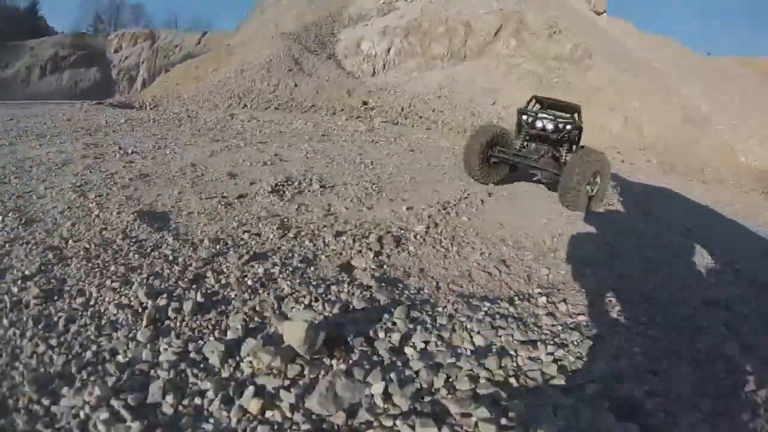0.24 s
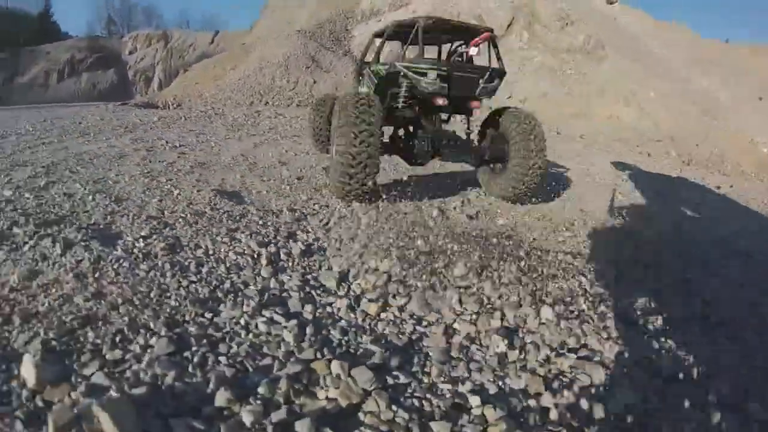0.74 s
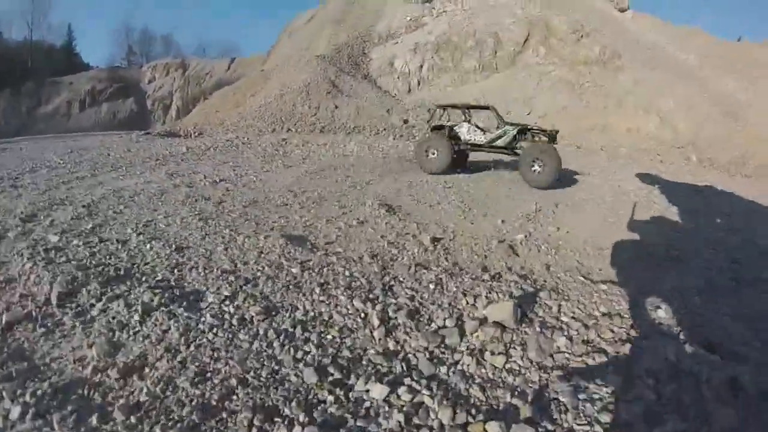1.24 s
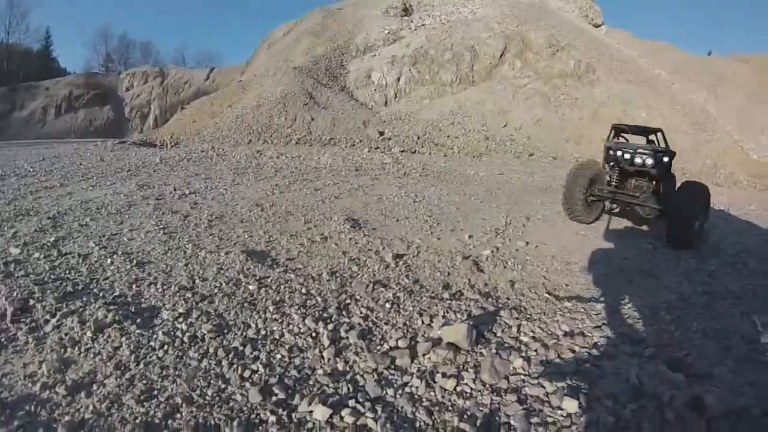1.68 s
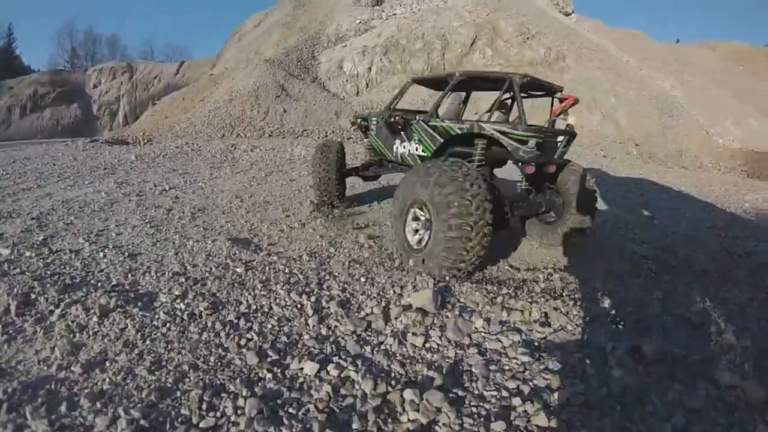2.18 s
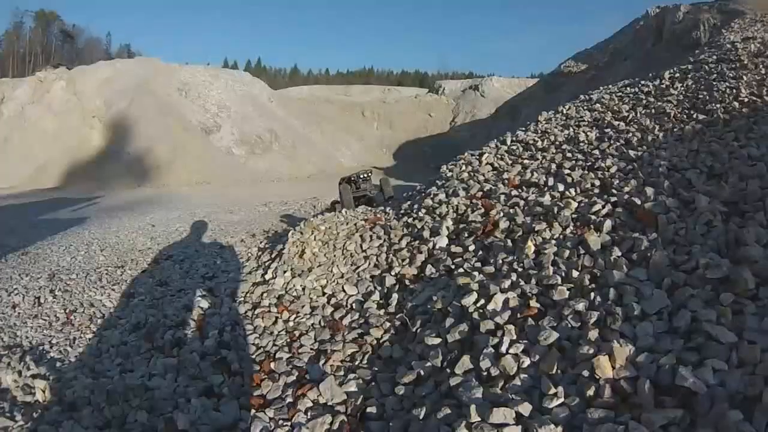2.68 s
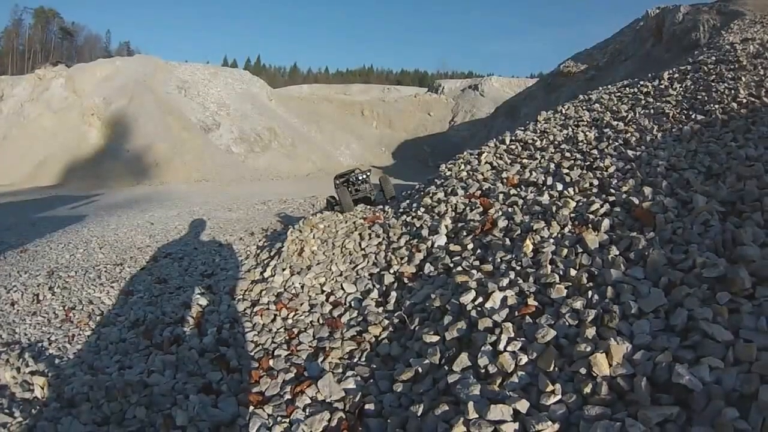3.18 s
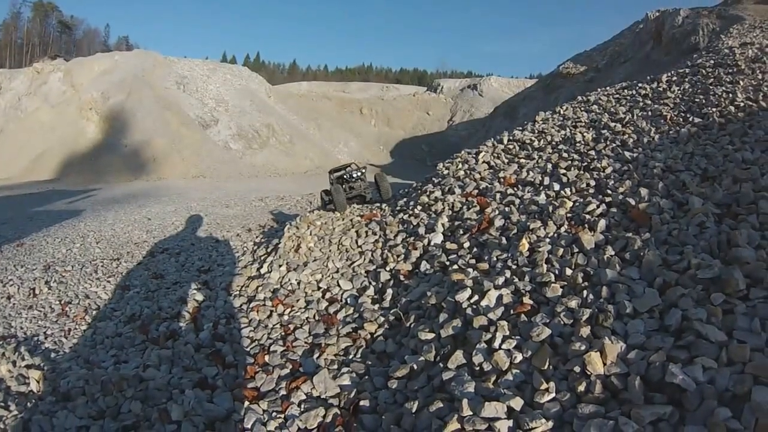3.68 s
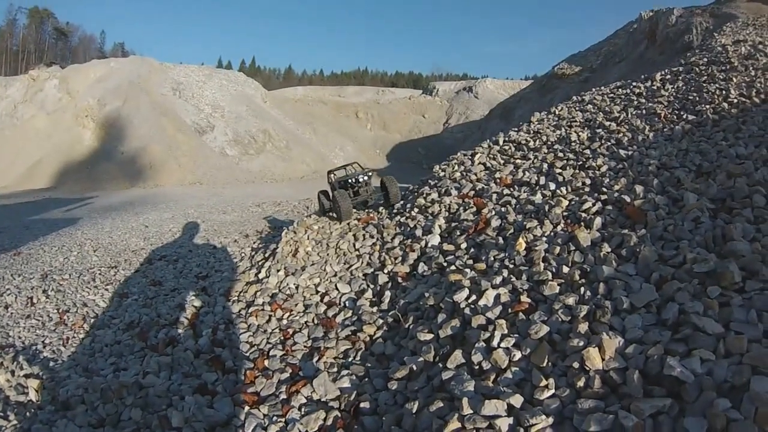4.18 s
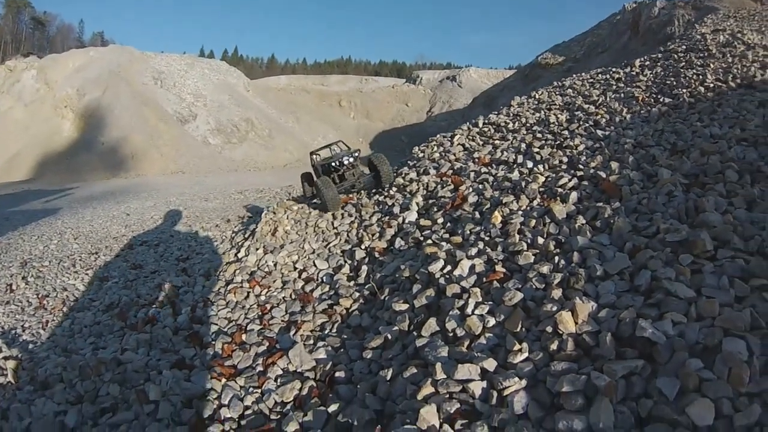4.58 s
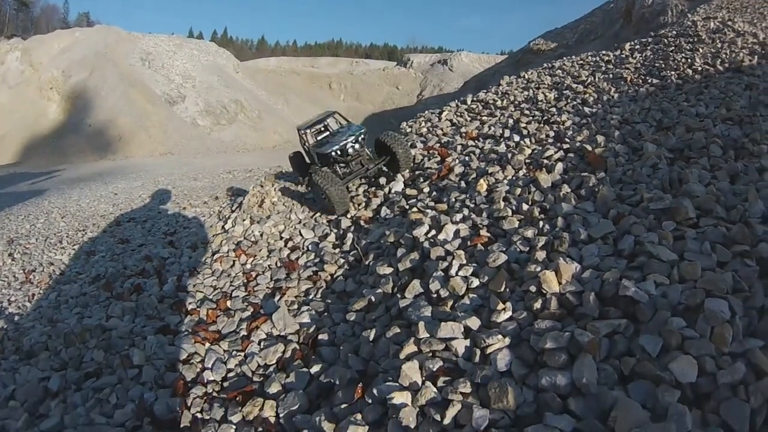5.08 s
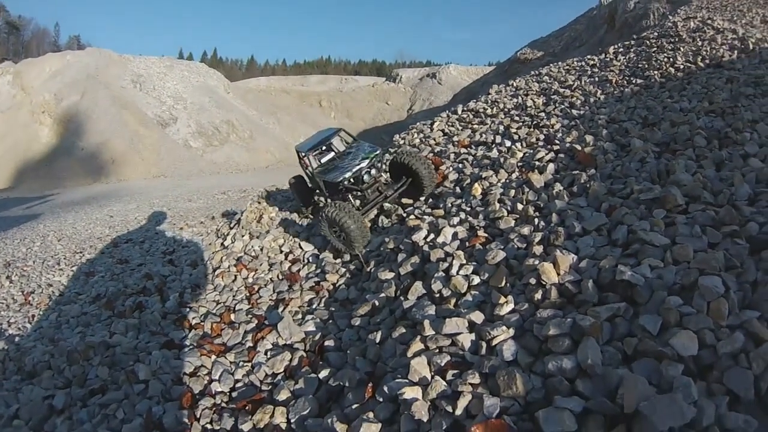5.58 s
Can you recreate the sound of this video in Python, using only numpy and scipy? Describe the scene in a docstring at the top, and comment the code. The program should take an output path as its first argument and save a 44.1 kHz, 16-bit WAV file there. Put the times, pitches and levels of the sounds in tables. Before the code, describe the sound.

Open quarry, faint even air, both channels alike. From 0 to 2.5 s a small electric truck spins circles on gravel close by: tyres drum, grind and spray grit, swelling to a first pass near 0.6 s, receding around 1.5 s, and swelling again near 2.2 s, with bouncing surges. A shrill, rough gear tone around 4 kHz sags and chirps with rapid bites. Small ticks hit the camera housing; very loud, hard stone cracks come at 0.86 and 1.1 s, with a lesser cluster at 0.93 s and dull jolts beneath. At 2.5 s it abruptly becomes much quieter: the truck crawls up a stone heap from three metres to one. Low, pulsing gear whine is faint at first, stronger from 3.8 to 5.2 s, then sinks. Tyres grate, grit hisses, brief squeaks sound and a thin high controller whistle persists. Dull stone clacks are sparse, then cluster from 5.15 s to the end.

```python
"""Close by in an open quarry, a small electric truck spins circles on gravel, tyres drumming and grinding.
Its gears sing and sag each time the tyres bite; flung stones ring the camera's housing near the microphone.
Then, abruptly, it crawls up a heap of stones from about three metres to one, gears whining low,
speed controller whistling. Shaped noise makes tyres, grit and air; swept tones the gears; decaying modes the hits."""
import sys
import numpy as np
from scipy import signal
from scipy.fft import rfft, irfft, next_fast_len
from scipy.io import wavfile
from scipy.ndimage import uniform_filter1d

SR = 44100
rng = np.random.default_rng(int(sys.argv[2]) if len(sys.argv) > 2 else 0)


def log_audio(samples):
    """Write samples as a 16-bit WAV file to the path given in sys.argv[1]."""
    # one column per channel
    frames = np.atleast_2d(samples).T
    # limit to full scale, then quantise
    limited = np.clip(frames, -1, 1)
    pcm = np.round(limited * 32767).astype(np.int16)
    wavfile.write(sys.argv[1], SR, pcm)


N = 257544
TIME = np.arange(N) / SR
CUT_S = 2.516  # the close spin ends and the climb begins
EDGE_HZ = 15500  # upper limit of the band
FREE_HZ, IDLE_HZ = 4407, 419  # gear pitch with the wheels spinning freely, and at a creep
SAG_S, RECOVER_S = 0.03, 0.028  # longest slowing under a bite, and the time to pick up again

# The truck circles past twice. Each row: time in seconds, distance in metres.
CIRCLING = [(0, 2.1), (.45, 1.5), (.6, 0.96), (1.0, 1.15), (1.25, 1.7), (1.5, 2.48), (1.75, 2.06),
            (2.2, 0.84), (2.5, 1.14)]
# The bouncing chassis presses the tyres in (+) or lifts them (-).
# Each row: start in seconds, length in seconds, change of load in dB (in full on the roar).
BOUNCES = [(0.51, .17, 4), (0.713, 0.048, 3), (0.768, 0.052, -6), (0.82, 0.084, 6.5), (1, 0.038, 2.5),
           (1.482, 0.047, -3.5), (1.566, 0.063, 3), (1.65, 0.095, -4), (1.739, 0.064, 5),
           (1.899, 0.073, 5.5), (1.987, .04, 0), (2.035, 0.1, 6.5), (2.158, 0.052, 3.5),
           (2.384, 0.039, 2.5)]
# Spectra of the spinning tyres' drumming, grinding and flung grit.
# Each row: frequency in Hz, relative level in dB.
SPIN_ROAR = [(25, -26.5), (80, -12.5), (110, -8.5), (141, -2), (172, -6.5), (280, 0), (450, 1.5),
             (640, 0.5), (800, -4), (1030, -0.5), (1200, -8), (1450, -16.5), (2200, -47)]
SPIN_CRUNCH = [(900, -23), (1450, -4), (1750, 6.5), (2100, -2), (2500, 0.5), (3300, -2), (3950, 2.5),
               (4400, -8), (4800, -13), (5400, -5.5), (6200, -24), (9000, -35)]
SPRAY = [(3500, -25.5), (5400, -1), (6600, -2), (8200, 2), (9400, -0.5), (11000, -0.5), (12500, -2.5),
         (13600, -8), (14700, -9), (15600, -20.5)]
# Spectrum of the open pit's hush. Each row: frequency in Hz, relative level in dB.
AIR = [(25, -1.5), (70, 0.5), (200, -3.5), (450, -6), (800, -11), (1900, -21.5), (4000, -20.5),
       (4800, -23.5), (5600, -21.5), (8000, -25), (12500, -25.5), (13500, -45.5)]
# Tyres bite and drag the motor down.
# Each row: start in seconds, length in seconds, sag in Hz, level in dB ahead of the gear case.
BITES = [(.010, 0.032, 543, -50.5), (0.141, 0.039, 690, -49.5), (0.227, 0.02, 444, -47.5),
         (0.284, .036, 706, -45.5), (0.376, 0.028, 419, -40), (0.397, .036, 379, -42.5),
         (.451, .029, 558, -41), (.524, 0.015, 603, -38), (0.589, .022, 551, -36),
         (0.653, 0.037, 1353, -36.5), (.698, 0.047, 500, -47), (0.873, 0.037, 1353, -39),
         (1.015, 0.015, 1100, -38.5), (1.192, 0.022, 473, -48), (1.232, .032, 684, -47.5),
         (1.306, 0.025, 779, -49), (1.389, .03, 400.4, -57), (1.424, .065, 505, -47),
         (1.599, 0.015, 1720, -43.5), (1.67, 0.027, 546, -47), (1.762, .045, 477.2, -48),
         (1.805, 0.033, 948, -40.5), (1.888, .065, 520, -44), (1.957, .029, 899, -35.5),
         (2.034, .038, 393, -43), (2.091, .038, 954, -37.5), (2.175, .032, 798, -38),
         (2.246, .047, 703, -38.5), (2.321, .035, 600.4, -41.5), (2.412, .024, 652, -54),
         (2.466, 0.034, 780, -41)]
# Partials of the racing gears. Each row: multiple of the gear pitch, relative level in dB, roughness 0-1.
FAST_ORDERS = [(.25, -7.5, 0.6), (1, -0.5, 0.4), (2, -29.5, 0.9)]
# Response of the case to the racing gear pitch. Each row: frequency in Hz, gain in dB.
GEAR_CASE = [(2700, -5.5), (3300, -7.5), (3900, 0), (4250, -1), (4600, -8)]
# Spectrum of the rasping teeth. Each row: frequency in Hz, relative level in dB.
GEAR_RASP = [(2400, -23), (3400, -10.5), (3900, 6), (4300, -3.5), (4700, -24), (5400, -12), (6200, -28),
             (7800, -25.5), (9100, -22.5), (10500, -32)]
# Flung stones hit the housing. Each row: start in seconds, relative level in dB,
# weight of the low modes in dB, weight of the highest modes in dB.
STRIKES = [(.3895, -35, -14, -2), (.7180, -37.5, -7, 12), (.7605, -40, -22, 11), (.7690, -41.5, -13, 10),
           (.7920, -34, -18.5, 8), (0.8595, -3.5, -20.5, 1), (0.8613, -12, -16, -7), (.8655, -33, -3, 13),
           (.8715, -27.5, -24.5, 10), (.8942, -27, -2, 9), (.8990, -35.5, -16, -3), (.9020, -35, -13.5, 1),
           (0.9307, -16.5, -4.5, -1.5), (0.932, -14, -17, -4), (.9335, -25.5, -8.5, 9),
           (.9860, -40.5, -14.5, 3), (1.0645, -39, -8, 2), (1.0961, -2, 0.5, -6.5), (2.078, -37.5, -15, -4),
           (2.2000, -29, -28, 17), (2.3, -42, -15, 9), (2.3300, -25, -16, 17), (2.4422, -37.5, -24, 7)]
# The housing's modes. Each row: frequency in Hz, relative level in dB, 60 dB decay time in seconds.
HOUSING = [(746, -19, .075), (840, -1.5, 0.023), (976, -6, 0.016), (1600, -6, 0.016), (1910, -10.5, 0.014),
           (2430, -6.5, 0.012), (2994, -5, 0.018), (3480, -8.5, .009), (3930, -4.5, .011),
           (4500, -2.5, 0.0061), (5068, 0.5, 0.0067), (5970, -11, .008), (6590, -9, .008),
           (7220, -15.5, 0.01), (10570, -9, 0.0038), (11600, -9.5, 0.0035), (14200, -20.5, 0.0049)]
# The camera is jolted. Each row: start in seconds, relative level in dB.
JOLTS = [(0.559, -61), (0.74, -55.5), (0.86, -62.5), (1.094, -61)]
# The truck climbs towards the microphone. Each row: time in seconds, distance in metres.
CLIMBING = [(2.54, 3.26), (3.6, 2.9), (4.3, 2.42), (4.9, 1.34), (5.84, 1.13)]
# Blips of throttle, each a rounded swell. Each row: time of the top in seconds, half width in seconds,
# top gear pitch in Hz, relative level in dB.
BLIPS = [(2.62, .05, 474, -75), (2.989, .06, 485, -74), (3.235, .07, 602, -72.5), (3.70, .04, 451, -76),
         (3.817, .06, 899.4, -61), (3.961, .04, 734, -67.5), (4.22, 0.066, 630, -65),
         (4.305, .075, 812, -61), (4.435, .1, 745, -63), (4.49, .08, 815, -66), (4.595, 0.075, 930.4, -64),
         (4.72, .075, 957.6, -66), (4.824, .075, 950, -64.5), (4.869, .38, 846.4, -67.5),
         (4.972, .055, 1178, -63), (5.06, .085, 995, -69.5), (5.125, 0.098, 863.5, -67.5),
         (5.261, .08, 574, -74), (5.431, .1, 472, -76)]
# Spectra of the climb: rolling tyres, grating stones, fine grit. Each row: frequency in Hz, relative level in dB.
CRAWL_ROAR = [(25, -8), (60, -8), (160, -5), (260, -7.5), (450, -0.5), (650, -6), (1000, -7), (1400, -13),
              (1850, -9), (2400, -18.5), (5000, -41.5)]
STONES = [(300, -36), (900, -8), (1400, -7), (1850, -1), (2300, -3), (3100, -1), (4000, 8.5), (4800, -5),
          (5300, 5.5), (6300, -3), (7500, -8), (11000, -19), (12600, -15), (13400, -67)]
FINE_HISS = [(4500, -29), (6200, -6), (8400, 1), (9300, -3.5), (10400, -2), (12500, -3), (13300, -19)]
# Fine grit slides from under the tyres. Each row: start in seconds, length in seconds, relative level in dB.
SLIDES = [(3.8, 0.088, -80.5), (4.23, .09, -69), (4.566, 0.44, -79), (5.519, 0.35, -83)]
# Partials of the crawling gears. Each row: multiple of the gear pitch, relative level in dB.
SLOW_ORDERS = [(1, 1), (2, -5.5), (3, -17), (4, -20), (5, -22), (6, -23)]
# Resonances of the gearbox. Each row: frequency in Hz, gain in dB.
GEARBOX = [(400, -3), (650, -10), (850, 1), (1250, -0.5), (1600, -2), (1900, -0.5), (2400, -7), (3000, 11),
           (3900, 10.5), (5000, 4)]
# Swell of the controller's whistle. Each row: time in seconds, gain in dB.
WHISTLE = [(2.54, .5), (3.8, -2), (4.3, 0.5), (5.3, 8), (5.6, 2), (5.84, 10)]
# Brief squeaks from the chassis. Each row: time of the middle in seconds, relative level in dB.
SQUEAKS = [(2.605, -73.5), (2.968, -69.5), (3.152, -71.5), (3.316, -76.5), (5.153, -64), (5.428, -73)]
# Stones shift under the crawling tyres. Each row: time in seconds, relative level in dB,
# pitch of the knock in Hz, share of scrape in dB.
CLACKS = [(2.607, -49, 430, -13), (2.691, -46, 463, -28), (2.713, -52, 333, -9.5), (2.969, -56, 337, -8),
          (2.992, -51.5, 536, -16.5), (3.153, -51, 507, -14.5), (3.181, -56, 402, -9),
          (3.298, -52.5, 447, -17.5), (3.334, -51, 477, -22), (3.392, -48, 503, -22.5),
          (3.785, -55, 820, -13.5), (3.951, -56, 707, -11.5), (3.998, -51, 431, -13),
          (4.818, -56.5, 970, -3), (5.15, -45, 799, -20), (5.171, -40, 735, -13),
          (5.224, -40, 420.5, -14.5), (5.232, -46, 740, -7), (5.249, -47, 342, -11),
          (5.281, -56.5, 756, 3.5), (5.326, -65, 810, -14), (5.384, -52, 486, -28), (5.425, -46, 658, -28),
          (5.472, -52, 711, -9.5), (5.56, -46.5, 471, -15), (5.683, -44, 480, -22),
          (5.728, -48.5, 443, -8.5), (5.762, -58.5, 450, -0.5)]


def gain_of(db):
    """Decibels to amplitude."""
    return 10 ** (np.asarray(db) / 20)


def evened(x):
    """Scales to unit rms."""
    return x / np.sqrt(np.mean(x ** 2) + 1e-20)


def read(points, hz):
    """Reads a spectrum on a log-frequency axis."""
    f, value = np.transpose(points)
    return np.interp(np.log(hz + 1), np.log(f + 1), value)


def curves(rows):
    """One value a sample for each column of a timed table."""
    s, *columns = np.transpose(rows)
    return [np.interp(TIME, s, c) for c in columns]


def add(mix, s, sound):
    """Mixes a sound in at time s."""
    part = mix[max(round(s * SR), 0):][:len(sound)]
    part += sound[:len(part)]


def colour(x, spectrum, size=4096):
    """A causal, minimum-phase filter with the given spectrum, so that clicks keep their sharp fronts."""
    log_gain = np.log(gain_of(read(spectrum, abs(np.fft.fftfreq(size, 1 / SR)))))
    response = np.exp(np.conj(signal.hilbert(log_gain)))
    taps = np.fft.ifft(response).real[:size // 2]
    return signal.oaconvolve(x, taps)[:len(x)]


def noise_like(spectrum):
    """Steady noise of the given spectrum."""
    return colour(rng.standard_normal(N), spectrum)


def drift(rate_hz):
    """Random wander of unit rms, fading out smoothly above about the given rate."""
    size = next_fast_len(N, real=True)
    slowness = np.exp(-(np.fft.rfftfreq(size, 1 / SR) / rate_hz) ** 2)
    return evened(irfft(rfft(rng.standard_normal(size)) * slowness, size)[:N])


def plateau(s, length, attack_s, release_s):
    """An envelope from 0 to 1: attack, hold, release."""
    return np.clip(0.5 + np.minimum((TIME - s) / attack_s, (s + length - TIME) / release_s), 0, 1)


def nearness_db(path):
    """Level gained by distance, against one metre."""
    return -20 * np.log10(np.maximum(curves(path)[0], 0.1))


def grains(per_s, spread_db, clump_db, clump_hz, wash, ring_s):
    """Stone contacts of uneven size over a noise wash, swelling and thinning together at random."""
    size = gain_of(spread_db * np.minimum(rng.exponential(1, N), 4))
    clicks = size * rng.choice([-1, 1], N) * (rng.random(N) < per_s / SR)
    # each contact takes one of ten short rattles
    kind, t = rng.integers(0, 10, N), TIME[:SR // 50]
    rattles = rng.standard_normal((10, len(t))) * np.exp(-t / ring_s)
    contacts = sum(signal.oaconvolve(clicks * (kind == k), evened(r))[:N] for k, r in enumerate(rattles))
    return (evened(contacts) + wash * rng.standard_normal(N)) * gain_of(clump_db * drift(clump_hz))


def rough_tone(turns, rough, width_hz):
    """A tone of which a share is smeared by random wander in strength and phase."""
    rough = np.clip(rough, 0, 1)
    smear = (drift(width_hz) + 1j * drift(width_hz)) / np.sqrt(2)
    return ((np.sqrt(1 - rough ** 2) + rough * smear) * np.exp(2j * np.pi * turns)).real


def quarry_air(level_db=-74):
    """The faint, even hush of the open pit, as steady shaped noise."""
    return gain_of(level_db) * evened(noise_like(AIR))


def spinning_tyres(roar_db=-47.0, crunch_db=-54.0, spray_db=-65.5, attack_s=0.01, release_s=0.022):
    """Lugs drum, grind gravel and spray grit; all grow with nearness and bounce load. Levels at one metre."""
    near_db = nearness_db(CIRCLING)
    load_db = sum(db * plateau(s, length, attack_s, release_s) for s, length, db in BOUNCES)
    drumming = grains(per_s=900, spread_db=1.5, clump_db=1.0, clump_hz=45, wash=0.93, ring_s=0.00068)
    grinding = grains(per_s=1800, spread_db=1.0, clump_db=0.86, clump_hz=50, wash=0.94, ring_s=0.00033)
    flung_grit = grains(per_s=2400, spread_db=5.5, clump_db=2.0, clump_hz=50, wash=1.1, ring_s=0.0006)
    roar = evened(colour(drumming, SPIN_ROAR))
    crunch = evened(colour(grinding, SPIN_CRUNCH))
    spray = evened(colour(flung_grit, SPRAY))
    # the brighter the layer, the more it gains by nearness
    out = gain_of(roar_db + 0.7 * near_db + load_db) * roar
    out += gain_of(crunch_db + near_db + 0.3 * load_db) * crunch
    out += gain_of(spray_db + 1.3 * near_db + 0.29 * load_db) * spray
    return out


def racing_gears(jitter=0.015, smear_hz=190, rasp_db=-58, rasp_follow=0.99, release_s=0.019):
    """The mesh tone swells and sags in pitch under each bite; rasping teeth follow its smoothed level."""
    coast_db = -66  # tone between bites, ahead of the case
    hz, level_db = np.full(N, float(FREE_HZ)), np.full(N, float(coast_db))
    for s, length, sag_hz, db in BITES:
        end = s + length
        sag = np.interp(TIME, [s, s + min(SAG_S, length), end, end + RECOVER_S], [0, 1, 1, 0])
        load_times = [s - 0.008, s + 0.037 * length, s + 0.55 * length, end, end + release_s]
        load = np.interp(TIME, load_times, [coast_db, db - 10.5, db, db - 6.5, coast_db])
        hz = np.minimum(hz, FREE_HZ - sag_hz * sag)
        level_db = np.maximum(level_db, load)
    turns = np.cumsum(hz * (1 + jitter * drift(360))) / SR
    tone = sum(gain_of(db) * rough_tone(k * turns, rough, smear_hz) for k, db, rough in FAST_ORDERS)
    effort_db = uniform_filter1d(level_db, size=SR // 8)
    # rasp_db holds where the effort is -50 dB
    rasp_level_db = rasp_db + rasp_follow * (effort_db + 50.0) + 2 * drift(40)
    rasp = evened(noise_like(GEAR_RASP)) * gain_of(rasp_level_db)
    return gain_of(level_db + read(GEAR_CASE, hz) + 1.5) * tone + rasp


def stone_strikes(scrape=0.83, scrape_s=0.00078):
    """Each stone scrapes and rings the housing: heavy ones wake low modes and rattle it, sharp ones the highest."""
    out, t = np.zeros(N), TIME[:SR // 10]
    contact = 1 - np.exp(-t / 0.00015)  # the stone takes a moment to press in
    rattle_db, rattle_t60 = -44, 0.2  # relative to the low weight; seconds
    scrape_tone = [(200, -0.5), (900, 1.5), (5000, -5.5), (8000, -4), (15000, -17.0)]
    rattle_tone = [(3000, -32), (4900, -20), (5060, 0), (5250, -18), (5440, -1.5), (5620, -22.5), (7500, -40.5)]
    small_case = [(40, -21.0), (150, -11.5), (400, -2.5), (750, -2.5)]  # it radiates little bass
    hz, mode_db, t60 = np.transpose(HOUSING)[:, :, None]
    for s, db, low_db, high_db in STRIKES:
        blow = [(1100, low_db), (1700, low_db / 2 - 3), (2800, 0), (5500, 0), (10000, high_db)]
        phase = 2 * np.pi * rng.random(hz.shape)
        modes = gain_of(mode_db + read(blow, hz) - 60 * t / t60) * np.sin(2 * np.pi * hz * t + phase)
        grit = colour(rng.standard_normal(len(t)) * np.exp(-t / scrape_s), blow)
        hit = (modes.sum(0) + scrape * colour(grit, scrape_tone)) * contact
        rattle = evened(colour(rng.standard_normal(len(t)), rattle_tone))
        hit += gain_of(rattle_db + low_db - 60 * t / rattle_t60) * rattle
        add(out, s, gain_of(db - 24) * evened(colour(hit, small_case)))
    return out


def camera_jolts(length_s=0.0091):
    """Dull, deep bumps through the camera's mount: low-passed noise that swells and dies."""
    out, t = np.zeros(N), TIME[:SR // 8]
    mount = [(15, -5.5), (45, -0.5), (90, 0), (200, -20), (600, -61)]
    for s, db in JOLTS:
        push = colour(rng.standard_normal(len(t)) * t * np.exp(-t / length_s), mount)
        add(out, s, gain_of(db - 6.5) * evened(push))
    return out


def throttle(fade_db=15, drag_db=1.0, drag_hz_per_s=3000):
    """Gear pitch and level: each blip swells from a creep, and the gears are louder while their pitch falls."""
    s, width, top_hz, db = np.transpose(BLIPS)[:, :, None]
    swell = np.exp(-((TIME - s) / width) ** 2)
    hz = IDLE_HZ + ((top_hz - IDLE_HZ) * swell).max(0)
    blip_db = (db - fade_db * ((TIME - s) / (2 * width)) ** 2).max(0)
    level_db = np.maximum(blip_db, -87)  # the creep's floor
    hz_per_s = uniform_filter1d(np.gradient(hz), size=SR // 50) * SR
    return hz, level_db + drag_db * np.tanh(-hz_per_s / drag_hz_per_s)


def crawling_tyres(roar_db=-66.0, crunch_db=-66, hiss_db=-90.5, slide_attack_s=0.078, slide_release_s=0.17):
    """Soft tyres roll over grating stones, louder with nearness and throttle; fine grit hisses and slides."""
    near_db, effort_db = nearness_db(CLIMBING), throttle()[1]
    effort_db = effort_db - effort_db.mean()
    rolling = grains(per_s=300, spread_db=4.0, clump_db=1.0, clump_hz=30.6, wash=0.9, ring_s=0.0041)
    ticks = grains(per_s=150, spread_db=2.3, clump_db=1.4, clump_hz=25, wash=0.95, ring_s=0.002)
    roar = evened(colour(rolling, CRAWL_ROAR))
    crunch = evened(colour(ticks, STONES))
    hiss = evened(noise_like(FINE_HISS))
    sliding = sum(gain_of(db - 1.0) * plateau(s, length, slide_attack_s, slide_release_s)
                  for s, length, db in SLIDES)
    out = gain_of(roar_db + 1.01 * near_db + 0.26 * effort_db) * roar
    out += gain_of(crunch_db + 1.3 * near_db + 0.2 * effort_db) * crunch
    out += (gain_of(hiss_db) + sliding) * hiss
    return out


def crawling_gears(jitter=0.018, flutter_db=2.5, smear_hz=50, echo=0.205):
    """The mesh tone and overtones follow the throttle through the gearbox's resonances; the slope echoes them."""
    hz, level_db = throttle()
    turns = np.cumsum(hz * (1 + jitter * drift(108))) / SR
    tone = np.zeros(N)
    for k, db in SLOW_ORDERS:
        rough = 0.25 + 0.17 * k  # higher overtones are rougher
        partial_db = db + read(GEARBOX, k * hz) + flutter_db * drift(37)
        tone += gain_of(partial_db) * rough_tone(k * turns, rough, smear_hz * k)
    direct = gain_of(level_db + 0.5) * tone
    out = direct.copy()
    add(out, 0.013, echo * direct)  # seconds behind the direct sound
    return out


def controller(switch_hz=5925, split=0.08, first_db=-82, second_db=-84, upper_db=-3):
    """The switching tone and its octave whistle, each split in two by the motor's turning."""
    hz, _ = throttle()
    turning_hz = split * (hz - 250)  # the pair closes up as the motor slows
    out = np.zeros(N)
    for k, db in enumerate([first_db, second_db], 1):
        for side, side_db in [(-0.66, 0.0043), (0.99, upper_db)]:
            turns = np.cumsum(k * switch_hz + 2 * side * turning_hz + 12 * drift(80)) / SR
            out += gain_of(db + side_db + 2 * drift(25)) * np.sin(2 * np.pi * turns)
    return out * gain_of(curves(WHISTLE)[0])


def chassis_squeaks(hz=1890, half_width_s=0.008, rough=0.53, smear_hz=70):
    """The chassis gives a short, rough squeak as it twists: a smeared tone in rounded pulses."""
    level = sum(gain_of(db) * np.exp(-((TIME - s) / half_width_s) ** 2) for s, db in SQUEAKS)
    return gain_of(3.5) * level * rough_tone(hz * TIME, rough, smear_hz)


def stone_clacks(knock_t60=0.022, knock_db=-25, scrape_db=-12, scrape_s=0.0027, settle_s=0.033,
                 chassis_hz=1880, chassis_t60=0.065):
    """A stone tips on its neighbour with a dull knock and a scrape, jolts the chassis, and grit settles after."""
    out, t = np.zeros(N), TIME[:SR // 10]
    settle, chassis = 0.14, 0.15  # shares of settling grit and of the jolted chassis
    for s, db, hz, share_db in CLACKS:
        rub = rng.standard_normal(len(t)) * (np.exp(-t / scrape_s) + settle * np.exp(-t / settle_s))
        knock_tone = [(hz / 4, -22), (hz * 0.83, -8), (hz, 0), (hz * 1.95, -9), (hz * 4, -30), (hz * 16, -55)]
        knock = evened(colour(rub, knock_tone))
        knock += evened(gain_of(-60 * t / knock_t60) * np.sin(2 * np.pi * hz * t))
        jolt = evened(gain_of(-60 * t / chassis_t60) * np.sin(2 * np.pi * chassis_hz * t))
        clack = gain_of(knock_db) * (evened(knock) + chassis * jolt)
        clack += gain_of(scrape_db + share_db) * evened(colour(rub, STONES))
        add(out, s + 0.0018, gain_of(db) * clack)
    return out


def scene():
    """The close spin gives way abruptly to the climb, under one quarry air; both channels are alike."""
    near = np.clip((CUT_S - TIME) / 0.003, 0, 1)
    spin = spinning_tyres() + racing_gears() + stone_strikes() + camera_jolts()
    crawl = crawling_tyres() + crawling_gears() + controller() + chassis_squeaks() + stone_clacks()
    mono = quarry_air() + near * spin + (1 - near) * crawl
    return np.array([mono, mono])


def record(dry):
    """The hardest strikes overload the microphone, softly rounded; then the band limit."""
    ceiling = 0.6
    rounded = ceiling * np.tanh(dry / ceiling)
    band = signal.firwin(511, EDGE_HZ, window=("kaiser", 9), fs=SR)
    return signal.oaconvolve(rounded, band[None], "same")


dry = scene()
out = record(dry)
log_audio(out)
```